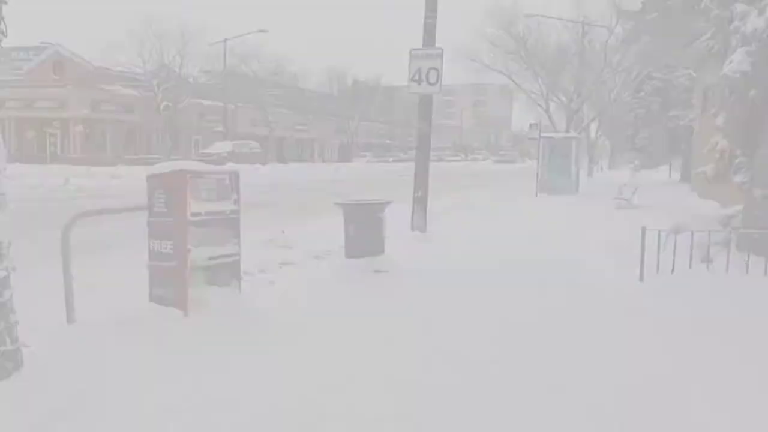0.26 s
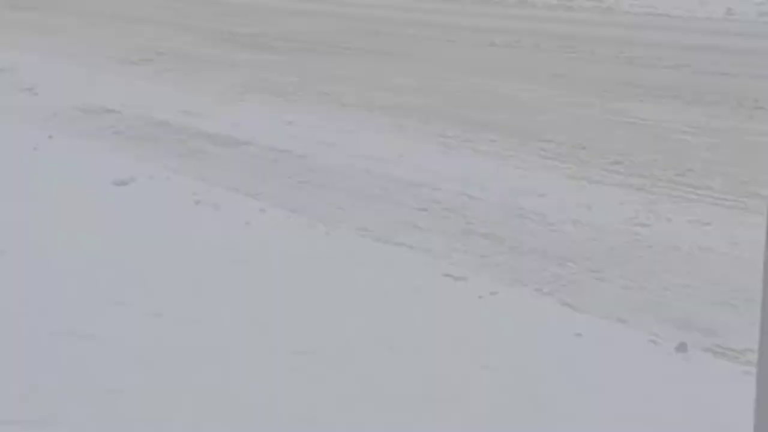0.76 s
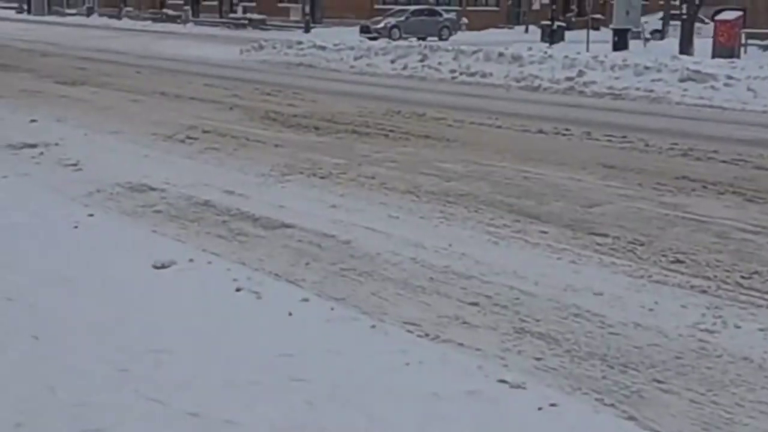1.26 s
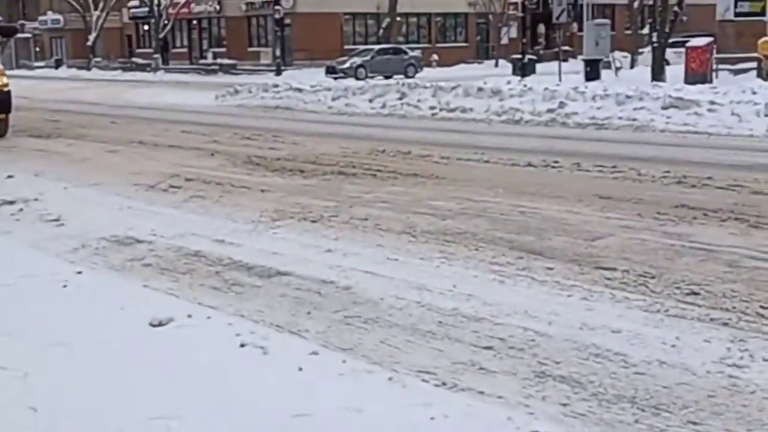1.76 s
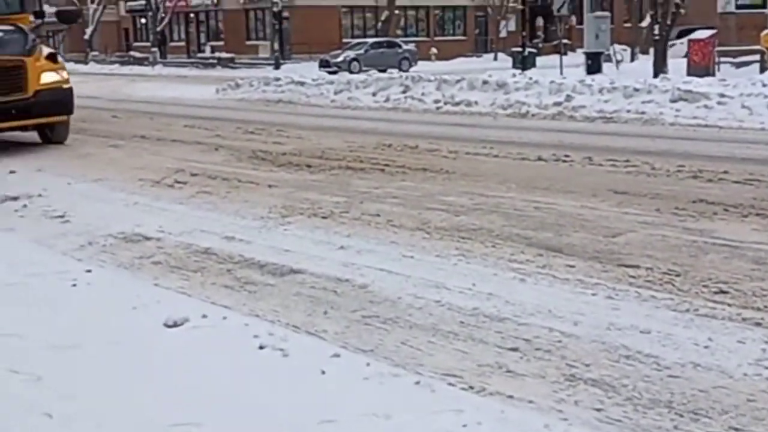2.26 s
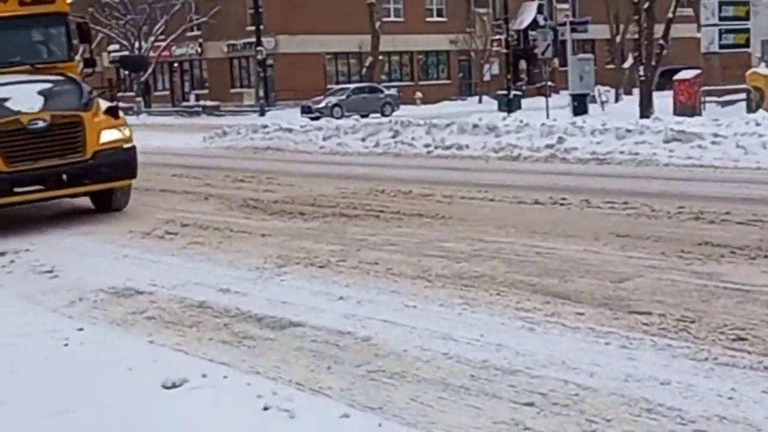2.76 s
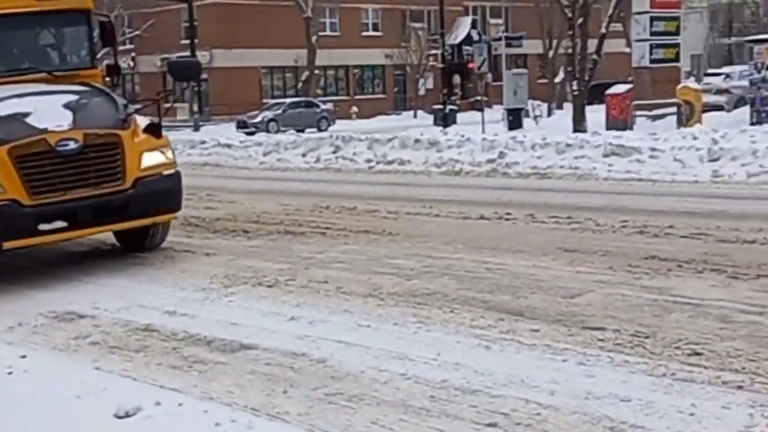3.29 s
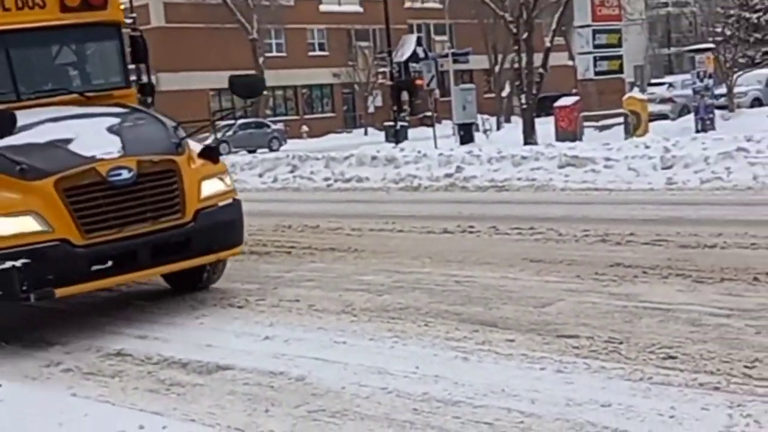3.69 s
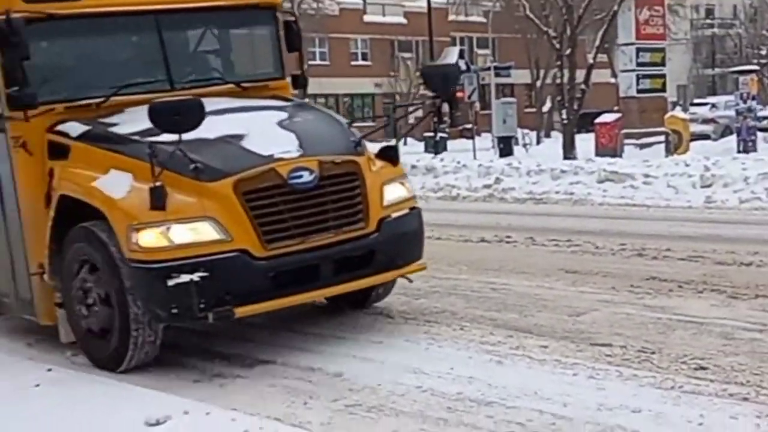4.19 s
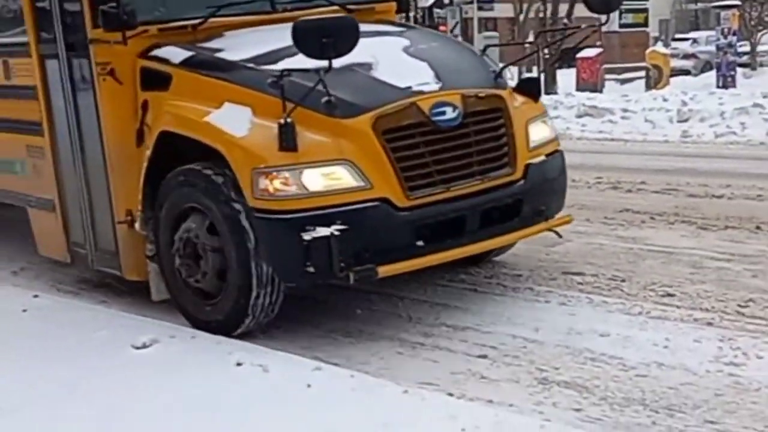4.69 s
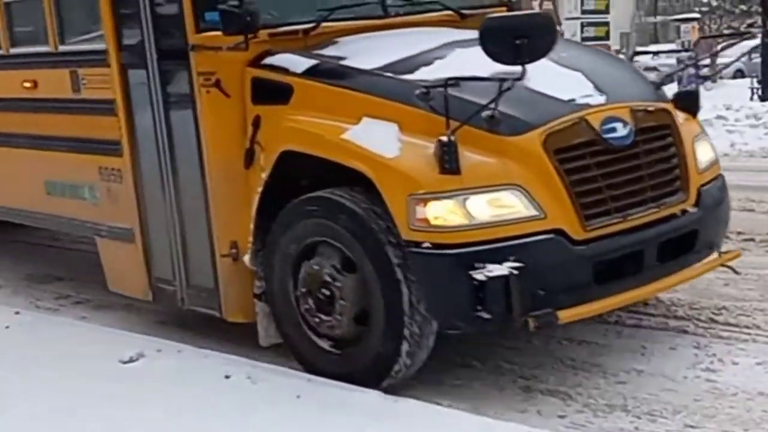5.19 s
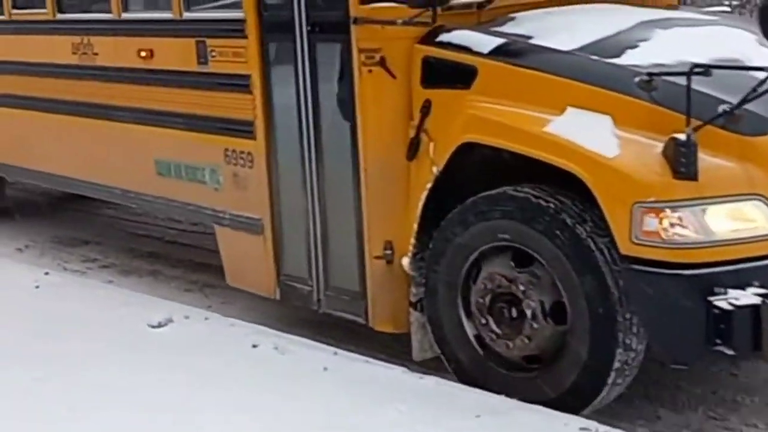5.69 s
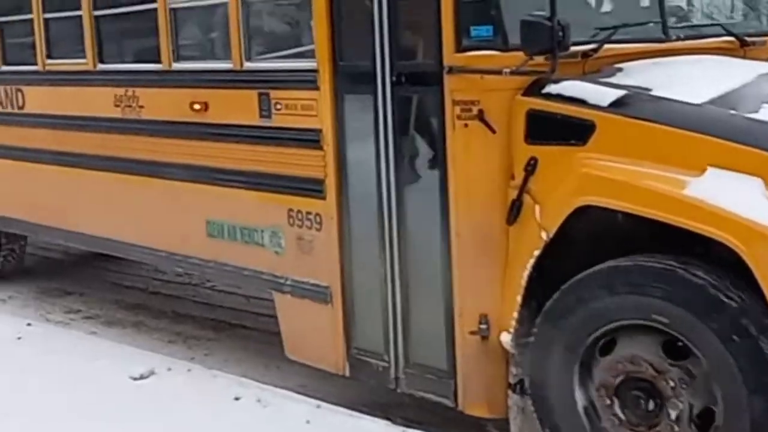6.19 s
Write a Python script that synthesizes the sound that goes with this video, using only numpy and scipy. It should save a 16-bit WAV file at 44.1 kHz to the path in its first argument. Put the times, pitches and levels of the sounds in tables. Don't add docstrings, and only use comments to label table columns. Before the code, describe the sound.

A far car hisses past, a brief silence, then a large bus rumbles up over packed snow, brakes squealing thinly and air brake hissing twice.

```python
import sys
import numpy as np
from scipy import signal
from scipy.fft import rfft, irfft
from scipy.io import wavfile
from scipy.ndimage import uniform_filter1d

SR = 44100
rng = np.random.default_rng(int(sys.argv[2]) if len(sys.argv) > 2 else 0)


def gain_from_decibels(decibels):
    exponent = np.asarray(decibels, float) / 20
    return 10 ** exponent


def generate_wav(signal):
    frames = np.transpose(np.atleast_2d(signal))
    scaled = np.clip(frames, -1, 1) * 32767
    pcm = np.round(scaled).astype(np.int16)
    wavfile.write(sys.argv[1], SR, pcm)


N = 284445

SILENCE_S = (.5037, .5368)
# time in seconds, level in dB.
CAR_LEVEL = [
    (0.0, -39.5),
    (0.09, -42),
    (0.496, -41),
    (0.5, -30.5),
]
# frequency in Hz, level in dB per Hz.
CAR_COLOUR = [(240, -38), (400, 0), (640, -3.5), (1280, -10), (1400, -9), (1680, -6.5), (3530, -11.5),
              (4830, -27.5), (5640, -21.5), (6510, -40), (7500, -52), (12000, -60), (15600, -77),
              (22000, -120)]
# multiple of its pitch, level in dB.
BOOM_COMPANIONS = [(2 / 3, -20), (4 / 3, -10)]
# frequency in Hz, level in dB per Hz.
STREET_COLOUR = [(35, -11), (60, -2), (90, -3.5), (164, -7.5), (240, -10), (310, -10.5), (390, -19.5),
                 (550, -20.5), (850, -19), (1150, -21.5), (1400, -26), (2000, -29), (5350, -43),
                 (7500, -72)]
STREET_PARTS_HZ = [150, 300, 800, 2600, 7000]
# frequency in Hz, likeness from 0 to 1.
LIKENESS = [(40, 0.85), (80, 0.91), (150, 1), (350, 0.92), (700, 0.7), (1400, 0.48), (3000, 0.063),
            (6000, 0.23), (8000, 0.3), (10000, 0.91)]
# start in seconds, peak in dB, pitch in Hz.
SNOW_POPS = [(0.816, -33.5, 1010), (0.85, -37, 656), (0.884, -36, 940), (0.913, -38.5, 805),
             (1.008, -45, 775), (1.07, -36, 820), (1.173, -34, 857), (1.217, -36, 742), (1.325, -37, 684),
             (1.414, -35, 917), (1.694, -27.5, 870), (1.754, -30.5, 795), (2.082, -33.5, 790),
             (2.344, -39, 871), (2.362, -28.5, 962), (2.374, -30, 690), (2.389, -33, 787),
             (2.407, -37, 760), (2.471, -33, 1127), (2.518, -26, 771), (2.586, -23.5, 849),
             (2.785, -37, 1010), (4.179, -45, 877), (4.306, -33, 938), (4.496, -30, 702), (4.81, -32, 774),
             (4.831, -29, 810), (5.167, -32, 630), (5.189, -29, 680), (5.214, -33, 740)]
# time in seconds, left minus right in dB.
SQUEAL_PAN = [(0.54, -6), (1.18, -4.5), (2.25, -5.5), (2.45, 5.5), (2.71, -3), (2.91, 9.5), (3.01, 7),
              (5.03, -8.5), (5.26, 0), (5.58, -9.5), (6.1, 4), (6.45, -5)]
# fully open in seconds, held in seconds, jet in dB, rise at full flow in dB,
# hollow low part in dB.
AIR_BLOWS = [
    (2.98, 0.78, -51.5, 9, -48),
    (5.67, .51, -52, 3.5, -58.5),
]
# frequency in Hz, level in dB per Hz.
JET_COLOURS = [
    [(4060, -44), (6900, 6), (6990, 2), (7700, 6), (8530, -3.5), (11200, -3), (12700, -9), (14600, -5),
     (15600, -13)],
    [(3240, -1), (5500, -8), (7370, 9.5), (8510, -5), (11100, -6.5), (13000, -12), (14800, -7),
     (15600, -23)],
]
# centre in seconds, length in seconds, level in dB.
AIR_SPITS = [
    (1.039, .016, -48),
    (1.052, .05, -57),
    (1.415, .04, -65),
    (2.426, .014, -56),
    (2.505, .04, -65),
    (2.42, .7, -63),
]
# frequency in Hz, level in dB per Hz.
HISS_COLOUR = [(4000, -77), (5500, -1), (7300, 5), (8500, -7), (9800, -15), (11000, -12), (13500, -9.5),
               (15500, -15)]
# time in seconds, pitch in Hz, roughness from 0 to 1.
UPPER_SLIP = [(.54, 6560, .8), (.7, 6610, .7), (1.1, 6670, .8), (1.5, 6660, .8), (2.0, 6640, .9),
              (2.25, 6620, .9), (2.33, 6690, .2), (2.7, 6665, .2), (3.05, 6655, .1), (3.2, 6590, .7),
              (3.8, 6585, .4), (4.2, 6565, .4), (4.5, 6540, .2), (4.8, 6555, .4), (5.1, 6560, .3)]
MIDDLE_SLIP = [(.54, 6470, .9), (1.4, 6530, .9), (1.75, 6515, .6), (2.2, 6490, .6), (2.7, 6520, .9),
               (4.15, 6480, .8), (4.5, 6480, .9), (4.56, 6470, .2), (4.7, 6455, .2), (4.85, 6480, .5),
               (5.0, 6450, .2), (5.15, 6482, .08), (5.3, 6473, .03), (5.55, 6473, .04), (5.66, 6560, .3)]
LOWER_SLIP = [(4.1, 6400, .6), (4.34, 6392, .2), (5.1, 6390, .3), (6.14, 6300, .4), (6.19, 6235, .4),
              (6.21, 6350, .2), (6.26, 6315, .03), (6.38, 6280, .1), (6.45, 6260, .3)]
# frequency in Hz, lead in radians.
LEFT_LEAD = [(60, 0), (340, .3), (860, 1.3), (1290, 3.3), (2070, 2 * np.pi)]
# frequency in Hz, level in dB per Hz.
HOLLOW_COLOUR = [(2500, 0), (3500, 3), (4300, 0), (5500, -1.5), (6500, -8), (8000, -6)]
# time in seconds, pitch in Hz, level in dB.
IDLE_TONE = [
    (4.9, 55.53, -50),
    (5.066, 58.4, -49),
    (5.42, 53.4, -41),
    (5.514, 53.96, -33),
    (5.732, 57.1, -31),
    (6.178, 56.57, -79),
    (6.2, 57.2, -31),
]
# time in seconds, level in dB.
SURGE_LEVEL = [
    (6.175, -62),
    (6.195, -25),
    (6.3, -25.5),
    (6.45, -26),
]
# centre in seconds, length in seconds, level in dB, pitch in Hz.
BOOMS = [(.1, 0.97, -36.5, 78.35), (.44, 0.27, -29.5, 76.15), (.83, 0.3, -33.5, 81.2),
         (1.46, 0.23, -55, 79.2), (1.93, 0.11, -51, 92.1), (2.36, 0.36, -33, 89.5), (2.63, 0.27, -23, 83.5),
         (2.95, 0.49, -35.5, 84), (3.25, 0.99, -30.5, 82.4), (3.47, 0.29, -23, 90.8), (3.75, .2, -46, 95),
         (3.95, 0.12, -23, 94.3), (4.2, 0.59, -25.5, 88.8), (4.35, 0.071, -26.5, 102.3),
         (4.7, 0.73, -47, 78), (5.05, 0.66, -26.5, 77.5), (5.5, 0.98, -31.5, 85), (5.92, 0.61, -27.5, 81),
         (6.3, 0.55, -28.5, 81)]
# time in seconds, nearness in dB, tyre load on the snow in dB.
APPROACH = [
    (.55, -13, -11.5),
    (1.1, -10, -10),
    (2.0, -8.5, -6.5),
    (2.8, -2.5, -6),
    (3.6, 2.5, -4),
    (4.1, -1, 0),
    (5.0, 1, -1.5),
    (5.3, 3, -6.5),
    (6.45, -4, -10.5),
]
# Rumble, body, crush and fan before the bus is there, in dB.
FAR_DB = [-41, -41, -45, -43.5]
# centre in seconds, length in seconds, rumble in dB, body drumming in dB.
JOLTS = [(.75, 1, -43, -51), (1.54, 0.5, -49, -42.5), (1.72, 0.16, -39, -67), (2.46, 0.6, -55, -41.5),
         (3.05, 0.12, -55, -45.5), (3.22, 0.05, -45, -26.5), (3.35, 0.23, -38, -58.5),
         (3.46, 0.067, -49, -35.5), (3.62, 0.25, -51, -72), (3.75, 0.05, -32, -39),
         (4.08, 0.46, -34.5, -42), (4.2, 0.61, -60, -36), (4.71, .2, -68, -35.5), (4.79, .15, -32, -33.5),
         (5.05, 0.35, -34.5, -53), (6.33, 0.22, -27, -30)]
# centre in seconds, length in seconds, level in dB.
CRUSTS = [
    (.7, 0.26, -46),
    (1.5, 0.9, -45),
    (1.72, 0.19, -44.5),
    (2.46, 0.78, -43.5),
    (3.2, 0.77, -50),
    (3.86, .2, -43),
    (4.11, 1, -57.5),
    (4.96, 0.21, -37),
    (6.38, 0.75, -52),
]
# centre in seconds, length in seconds, level in dB, and for the
# middle and lower notes the octave above in dB relative to the note.
UPPER_GRIPS = [(.68, 0.23, -55), (0.89, 0.45, -49), (1.064, 0.16, -42.5), (1.264, 0.45, -49),
               (1.49, 0.1, -40), (1.702, 0.54, -41), (2.11, 0.58, -40), (2.268, 0.67, -56),
               (2.463, 0.28, -42.5), (2.598, 0.24, -40.5), (2.887, 0.34, -40.5), (3.085, 0.12, -47),
               (3.223, 0.13, -47), (3.376, .2, -40), (3.58, 0.24, -39), (3.86, 0.38, -38),
               (4.006, 0.05, -34), (4.153, 0.16, -34), (4.373, 0.35, -35), (4.564, .3, -43),
               (4.932, 0.44, -35)]
MIDDLE_GRIPS = [(.9, 3.1, -51, -35), (1.28, 0.43, -48.5, -31), (1.68, 0.69, -45, -30),
                (2.15, 0.43, -42.5, -31), (2.7, 0.33, -43.5, -42), (3.02, 0.34, -49, -23),
                (3.208, 0.17, -41, -28), (3.44, 0.62, -41, -28), (3.57, 0.26, -44, -18),
                (3.86, 0.41, -58, -43), (4.02, 0.058, -55, -33), (4.11, 0.074, -40, -34),
                (4.27, 0.33, -42, -29), (4.62, 0.21, -34.5, -50), (4.84, 0.19, -40, -33),
                (4.99, 0.2, -28, -22), (5.32, 0.41, -27, -30), (5.502, .24, -24, -18.5),
                (5.619, .2, -39, -26)]
LOWER_GRIPS = [(4.15, .14, -48, -15), (4.34, 0.39, -42, -21), (4.845, .1, -38, -30),
               (4.999, 0.26, -33.5, -33), (6.171, 0.092, -31, -17), (6.264, 0.18, -29.5, -22),
               (6.345, 0.035, -34, -18), (6.395, .1, -36, -18)]
# centre in seconds, length in seconds, level in dB.
GUSTS = [
    (.84, .25, -39.5),
    (1.1, 0.051, -37),
]

SWELL_EDGE_DB, SWELL_SHARP = 19, 1.81
RUMBLE_DB, RUMBLE_FOLLOWS, BODY_DB, CRUSH_DB = -38, 0.12, -39, -40.5
FAN_FACING_S, FAN_DB = 2.47, -44.5
FAN_RISE_DB_PER_S, FAN_FALL_DB_PER_S = 4.5, 3
OPEN_DB_PER_S, SHUT_DB_PER_S = 177, 151
HOLLOW_LEADS_S, HOLLOW_GROWS_DB_PER_S = 0.064, 7
PANEL_HZ, PANEL_WIDTH_HZ, PANEL_DB = 280.2, 39, -3
SURGE_FIRINGS_PER_S, SURGE_UNEVEN_DB, SURGE_NOISE = 82, 4, 1
STREET_PAN_DB = -0.86


def rms_one(x):
    return x / np.sqrt(np.mean(x ** 2) + 1e-20)


def in_time(rows, outside=None):
    s, *columns = np.transpose(rows)
    return [np.interp(np.arange(N) / SR, s, column, outside, outside) for column in columns]


def at_hz(points, hz):
    table_hz, values = np.transpose(points)
    return np.interp(np.log(hz), np.log(table_hz), values)


def drift(rate_hz):
    r = np.exp(-40 * np.pi * rate_hz / SR)
    steps = rng.standard_normal(N // 20 + 2002)
    slow = signal.lfilter([1], [1, -2 * r, r * r], steps)[2000:]
    return np.interp(np.arange(N) / 20, np.arange(len(slow)), rms_one(slow))


def band(x, low_hz, high_hz):
    return signal.sosfilt(signal.butter(2, [low_hz, high_hz], "band", fs=SR, output="sos"), x)


def ports(x, lead_ms):
    i = np.arange(N)
    return np.array([x, np.interp(i - lead_ms * SR / 1000, i, x)])


def swells(rows, level=2, floor_db=-120):
    t = np.arange(0, N + 32, 32) / SR
    power = gain_from_decibels(2 * floor_db)
    for row in rows:
        from_centre = np.abs(2 * (t - row[0]) / row[1])
        power = power + gain_from_decibels(2 * (row[level] - SWELL_EDGE_DB * from_centre ** SWELL_SHARP))
    return np.interp(np.arange(N) / SR, t, np.sqrt(power))


def noise_spectrum(colour, diffuse=1):
    hz = np.maximum(np.arange(N // 2 + 1) * SR / N, 1)
    common, left, right = rfft(rng.standard_normal((3, N)))
    apart = np.clip(diffuse * (1 - at_hz(LIKENESS, hz)), 0, 1)
    late = np.exp(-1j * at_hz(LEFT_LEAD, hz))
    shared = common * np.array([np.ones_like(late), late])
    pair = np.sqrt(1 - apart) * shared + np.sqrt(apart) * np.array([left, right])
    return hz, pair * gain_from_decibels(at_hz(colour, hz))


def stereo_noise(colour, diffuse=1):
    return rms_one(irfft(noise_spectrum(colour, diffuse)[1], N))


def car():
    return stereo_noise(CAR_COLOUR) * gain_from_decibels(in_time(CAR_LEVEL, -120)[0])


def bus_levels():
    t = np.arange(N) / SR
    near_db, load_db = in_time(APPROACH)
    rumble = np.hypot(gain_from_decibels(RUMBLE_DB + RUMBLE_FOLLOWS * near_db), swells(JOLTS))
    body = np.hypot(gain_from_decibels(BODY_DB + near_db), swells(JOLTS, level=3))
    crush = np.hypot(gain_from_decibels(CRUSH_DB + load_db), swells(CRUSTS))
    rise_db = FAN_RISE_DB_PER_S * (FAN_FACING_S - t)
    fall_db = FAN_FALL_DB_PER_S * (t - FAN_FACING_S)
    fan = gain_from_decibels(FAN_DB - np.maximum(rise_db, fall_db))
    near = 20 * np.log10([rumble, body, crush, fan])
    return np.where(t < SILENCE_S[1], np.array(FAR_DB)[:, None], near)


def street(bus_db, patchy_db, grit_db):
    levels = np.vstack([bus_db, np.zeros(N)])
    change = levels - levels.mean(axis=1, keepdims=True)
    change[2:4, :round(SILENCE_S[0] * SR)] -= 20
    hz, noise = noise_spectrum(STREET_COLOUR)
    together, grit, out = drift(5.5), drift(370), 0
    for step in range(13):
        centre_hz = 40 * 2 ** (step / 1.5)
        slope = np.clip(1 - np.abs(1.5 * np.log2(hz / 40) - step), 0, 1)
        shares = [at_hz(list(zip(STREET_PARTS_HZ, one)), centre_hz) for one in np.eye(len(change))]
        flicker_db = patchy_db * (.5 * together + drift(9.8))
        if 400 < centre_hz < 3000:
            flicker_db = flicker_db + grit_db * grit
        out = out + irfft(noise * slope, N) * gain_from_decibels(shares @ change + flicker_db)
    hiss = gain_from_decibels(-58.5 + 2.6 * drift(6.7)) * stereo_noise(HISS_COLOUR) * gain_from_decibels([[1.2], [-1.2]])
    return gain_from_decibels(-31.5) * rms_one(out) + hiss


def panels(body_db):
    ring = band(rng.standard_normal(N), PANEL_HZ - PANEL_WIDTH_HZ, PANEL_HZ + PANEL_WIDTH_HZ)
    return ports(rms_one(ring) * gain_from_decibels(body_db + PANEL_DB), 0.38)


def boom(rough):
    pitch_hz = in_time(BOOMS)[-1]
    phase = 2 * np.pi * np.cumsum(pitch_hz) / SR
    out = 0
    for multiple, db in [(0.99, 0)] + BOOM_COMPANIONS:
        swing = np.sqrt(1 - rough) + np.sqrt(rough / 2) * (drift(14) + 1j * drift(14))
        out = out + gain_from_decibels(db) * (swing * np.exp(1j * multiple * phase)).real
    return ports(np.sqrt(2) * swells(BOOMS, floor_db=-41) * out, 0.28)


def mode(slip, grips, width_hz, octave_db=-30):
    hz, rough = in_time(slip)
    gain = swells(grips)
    octave_rows = [(s, length, db + (own_db[0] if own_db else octave_db)) for s, length, db, *own_db in grips]
    octave = swells(octave_rows)
    chatter = uniform_filter1d([drift(width_hz), drift(width_hz)], size=150)
    swing = np.sqrt(1 - rough) + np.sqrt(rough / 2) * (chatter[0] + 1j * chatter[1])
    ring = np.sqrt(2) * swing * np.exp(2j * np.pi * np.cumsum(hz) / SR)
    doubled = ring ** 2 / (np.abs(ring) + 1e-9)
    return (gain * ring + octave * doubled).real


def squeal():
    out = mode(UPPER_SLIP, UPPER_GRIPS, width_hz=70, octave_db=-25)
    out += mode(MIDDLE_SLIP, MIDDLE_GRIPS, width_hz=39)
    out += mode(LOWER_SLIP, LOWER_GRIPS, width_hz=160)
    out[:round(SILENCE_S[1] * SR)] = 0
    pan_db = in_time(SQUEAL_PAN)[0] / 2
    return ports(out, .025 + .013 * drift(12)) * gain_from_decibels([pan_db, -pan_db])


def pops(crush_db):
    t = np.arange(400) / SR
    shape = (t / 0.0006) * np.exp(1 - t / 0.00059)
    happens = rng.random(N) < 120 / SR
    size_db = np.minimum(rng.exponential(1, N), 3)
    small = happens * gain_from_decibels(size_db) * rng.choice([-1, 1], N)
    small[:round(SILENCE_S[1] * SR)] = 0
    small_crack = shape * np.sin(2 * np.pi * 950 * t)
    out = gain_from_decibels(crush_db + 1.5) * np.convolve(small, small_crack)[:N]
    for s, db, hz in SNOW_POPS:
        i = round(s * SR)
        out[i:i + 400] += gain_from_decibels(db + 5) * np.sin(2 * np.pi * 1.03 * hz * t) * shape
    return ports(out, 0.085) * gain_from_decibels([[-.8], [.8]])


def wind():
    lumps = rng.standard_normal((2, N)) * gain_from_decibels([2.7 * drift(37), 1.8 * drift(25)])
    return rms_one(band(lumps, 41, 250)) * swells(GUSTS)


def air():
    jets = [stereo_noise(colour, diffuse=21) for colour in JET_COLOURS]
    hollow, blows, t = stereo_noise(HOLLOW_COLOUR), 0, np.arange(N) / SR
    for jet, (s, held, jet_db, arch_db, hollow_db) in zip(jets, AIR_BLOWS):
        shut_db = SHUT_DB_PER_S * np.maximum(t - s - held, 0)
        open_db = OPEN_DB_PER_S * np.maximum(s - t, 0)
        hollow_open_db = OPEN_DB_PER_S * np.maximum(s - HOLLOW_LEADS_S - t, 0)
        flow = np.sin(np.pi * np.clip((t - s) / held, 0, 1) ** 0.62)
        jet = jet + gain_from_decibels(-3) * flow ** 2 * band(jet, 9100, 13300)
        jet_db = jet_db + arch_db * flow + 0.96 * drift(11) - open_db - shut_db
        hollow_db = hollow_db + HOLLOW_GROWS_DB_PER_S * (t - s) - hollow_open_db - shut_db
        blows = blows + jet * gain_from_decibels(jet_db + 3.5) + hollow * gain_from_decibels(hollow_db + 2)
    spits = band(jets[0][::-1], 3000, 9800) + 2.9 * hollow
    return blows * gain_from_decibels([[-5], [3]]) + spits * swells(AIR_SPITS)


def idle():
    hz, level_db = in_time(IDLE_TONE, -120)
    gain = uniform_filter1d(gain_from_decibels(level_db + 0.45 * drift(8.7)), size=2000)
    return np.sqrt(2) * gain * np.sin(2 * np.pi * np.cumsum(hz) / SR)


def surge():
    turns = np.cumsum(SURGE_FIRINGS_PER_S * (1 + .08 * drift(30.11))) / SR
    fires = np.diff(np.floor(turns), prepend=0) > 0
    firings = fires * gain_from_decibels(SURGE_UNEVEN_DB * drift(40))
    push = rms_one(firings) + SURGE_NOISE * rng.standard_normal(N)
    growl = band(push, 123, 162) * gain_from_decibels(6) + band(push, 178, 346)
    return ports(rms_one(growl) * gain_from_decibels(in_time(SURGE_LEVEL)[0]), 0.098)


def scene():
    levels = bus_levels()
    engine = boom(rough=.3) + idle() + surge()
    road = street(levels, patchy_db=1.2, grit_db=1.5) + pops(levels[2]) + panels(levels[1])
    road = road * gain_from_decibels([[STREET_PAN_DB / 2], [-STREET_PAN_DB / 2]])
    return road + car() + engine + squeal() + air() + wind()


def low_pass(x):
    return signal.sosfilt(signal.butter(12, 15830, fs=SR, output="sos"), x)


def record(dry):
    t = np.arange(N) / SR
    heard = signal.sosfilt(signal.butter(2, 40, "high", fs=SR, output="sos"), dry)
    silent = (t > SILENCE_S[0]) & (t < SILENCE_S[1])
    return low_pass(heard * np.where(silent, gain_from_decibels(-81), 1))


dry = scene()
out = record(dry)
generate_wav(out)
```